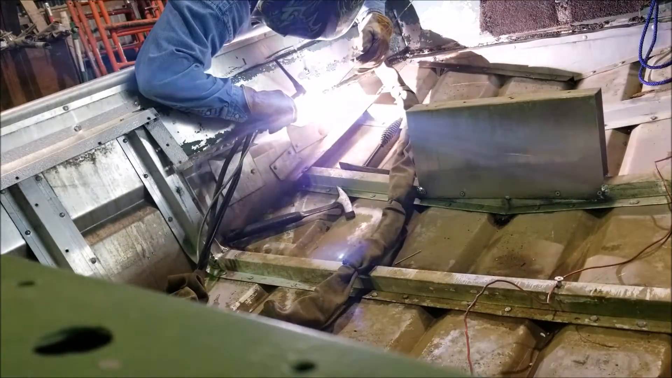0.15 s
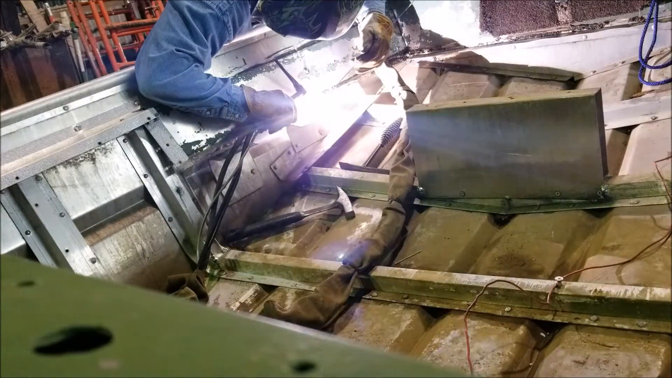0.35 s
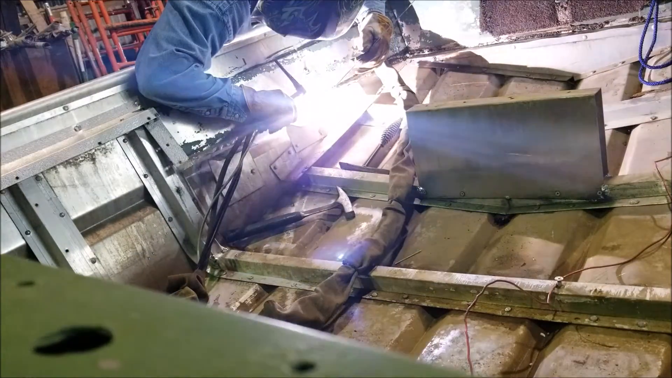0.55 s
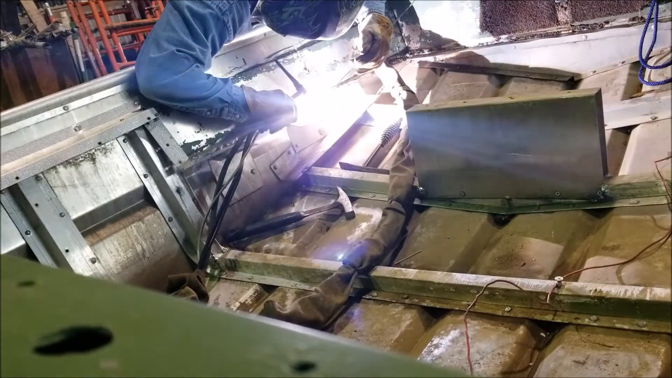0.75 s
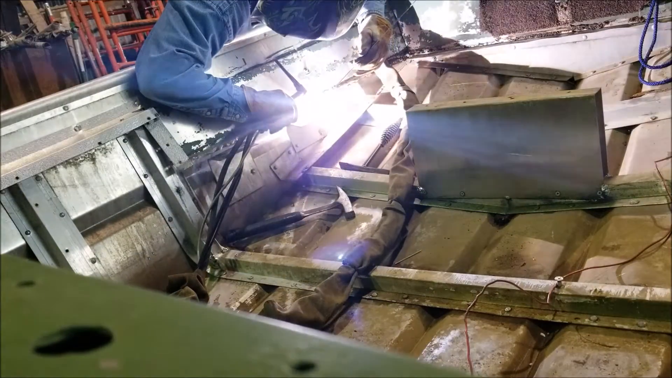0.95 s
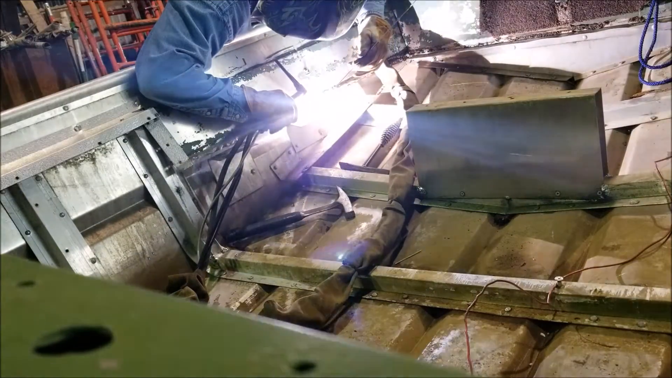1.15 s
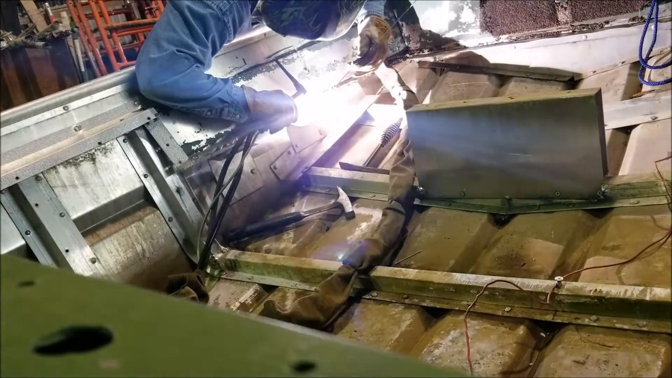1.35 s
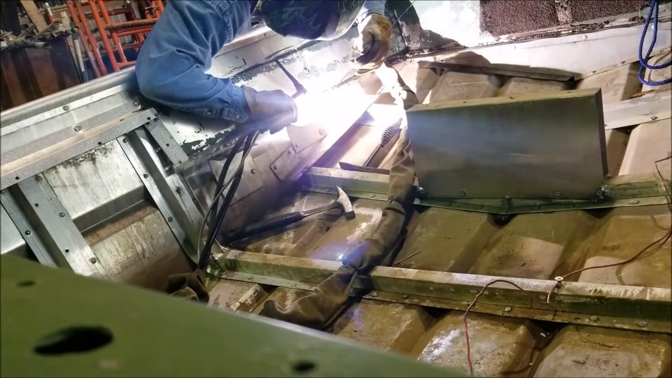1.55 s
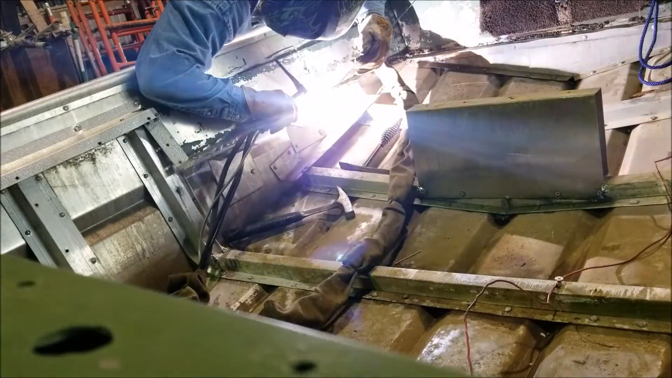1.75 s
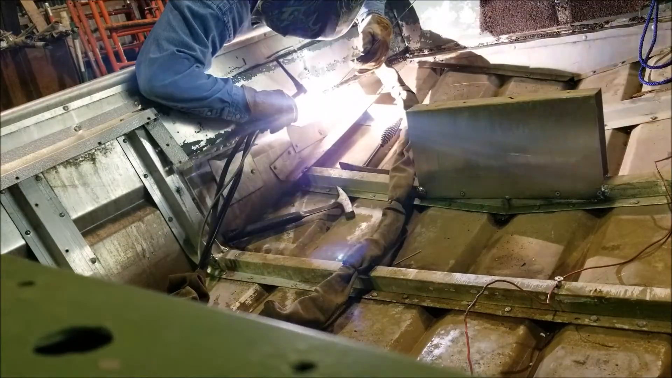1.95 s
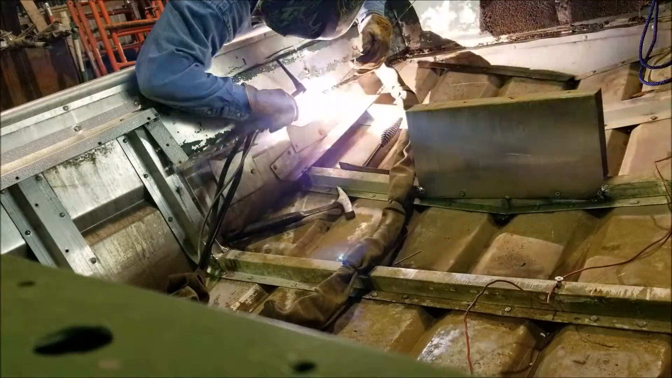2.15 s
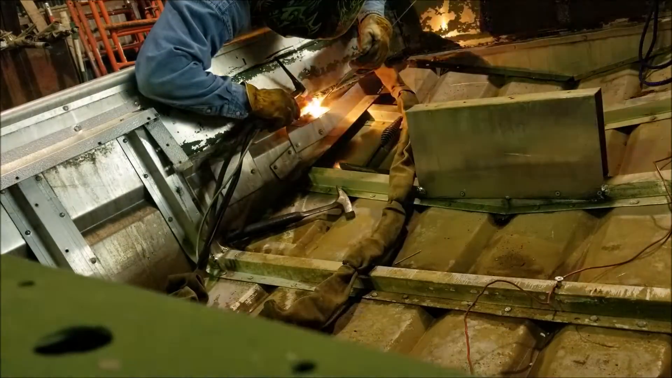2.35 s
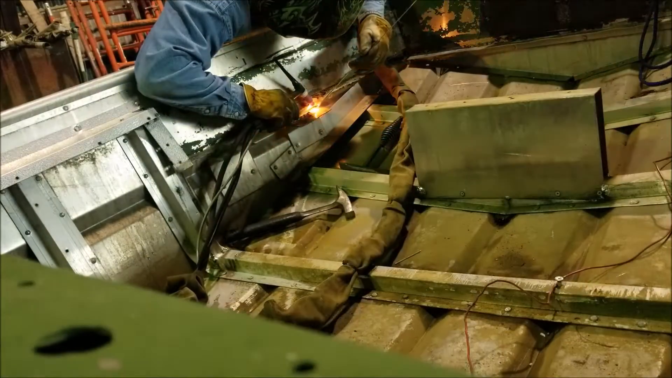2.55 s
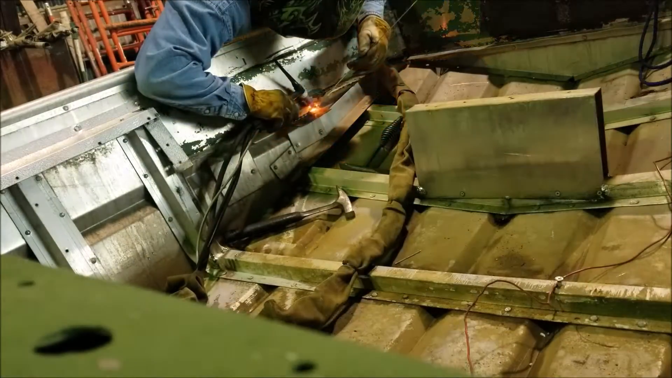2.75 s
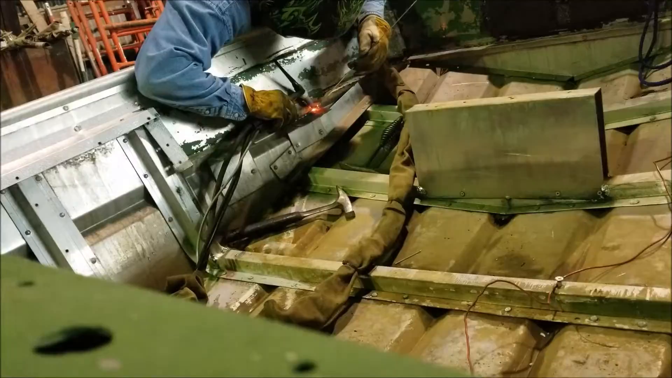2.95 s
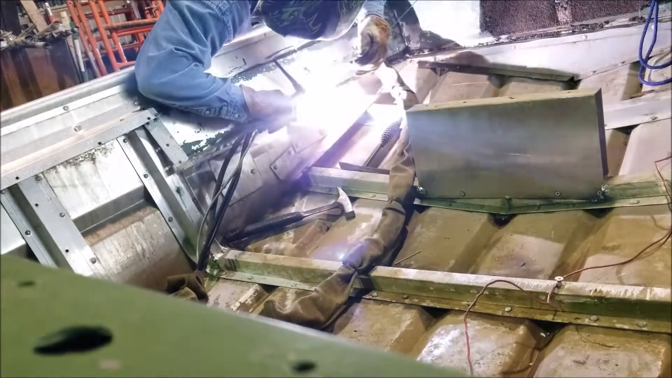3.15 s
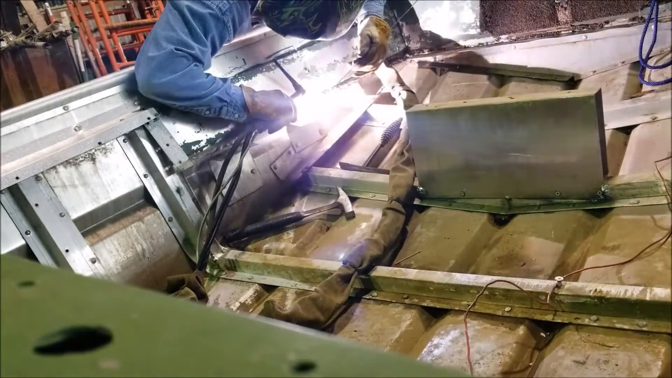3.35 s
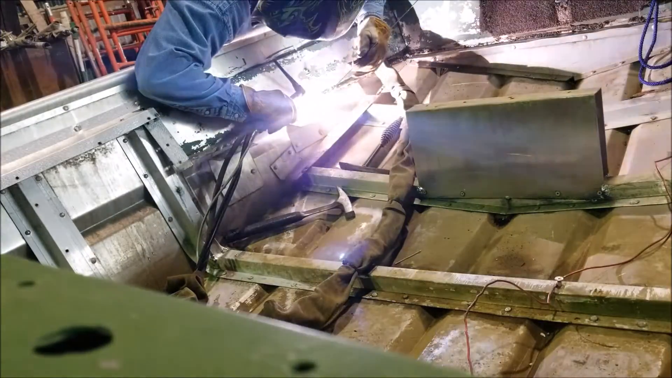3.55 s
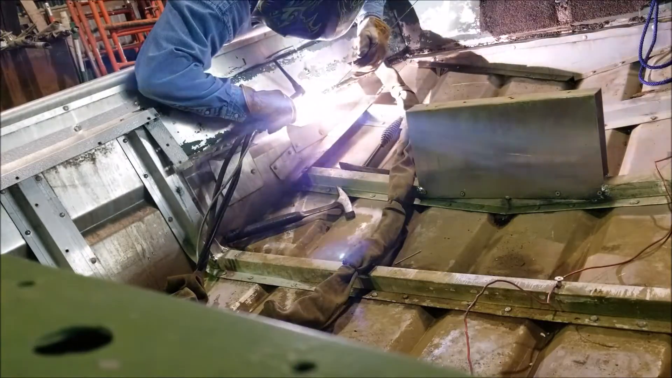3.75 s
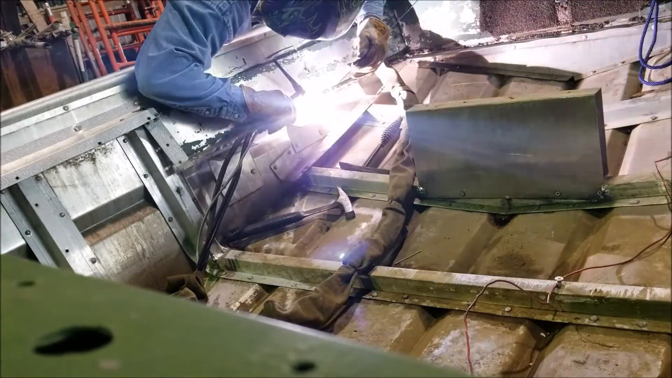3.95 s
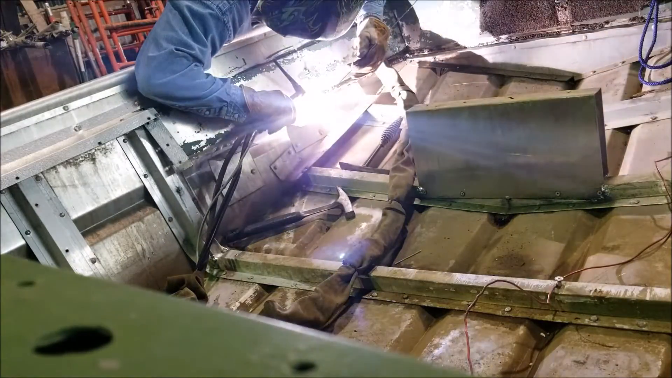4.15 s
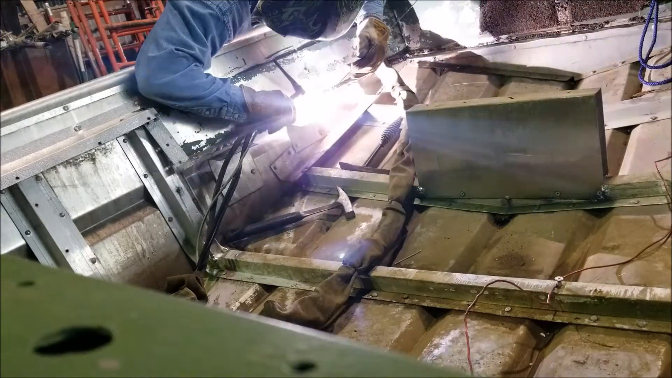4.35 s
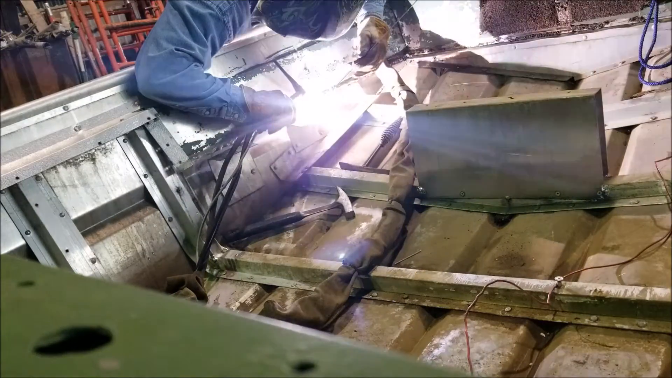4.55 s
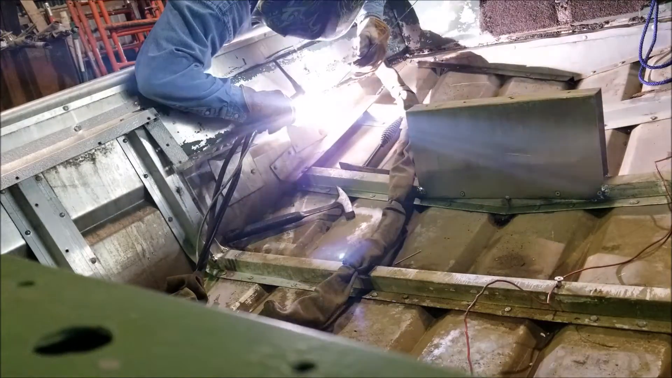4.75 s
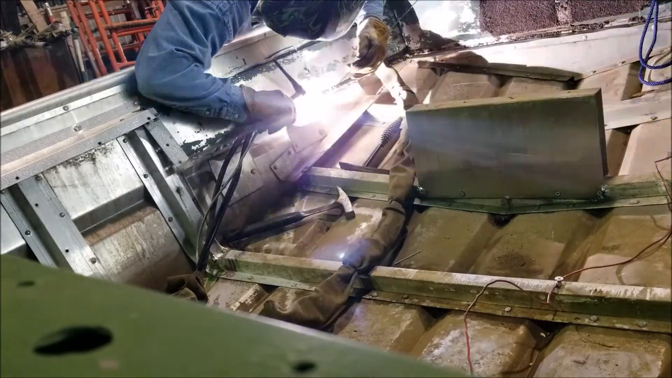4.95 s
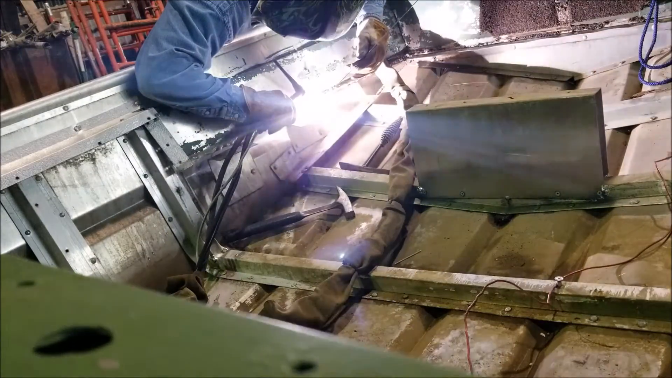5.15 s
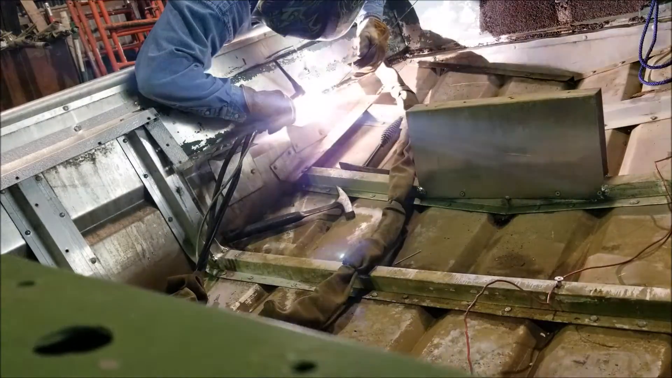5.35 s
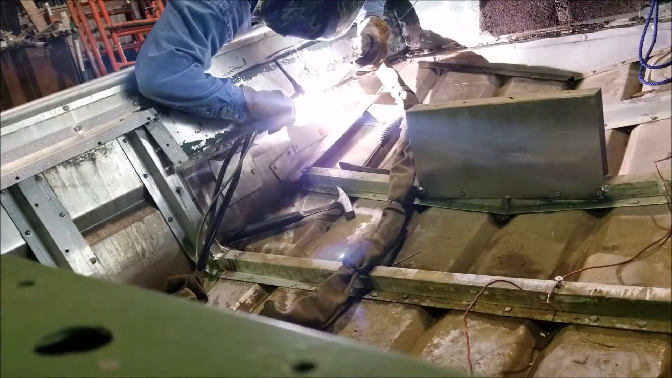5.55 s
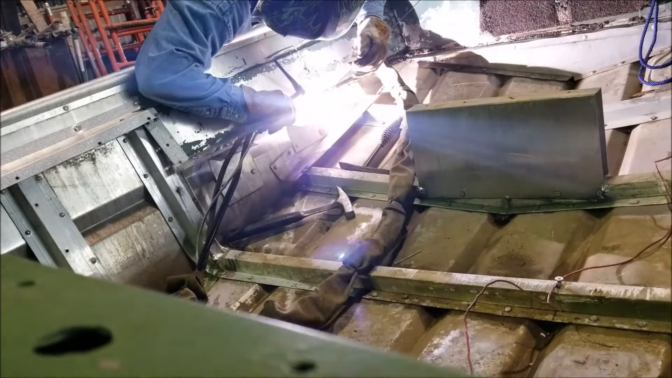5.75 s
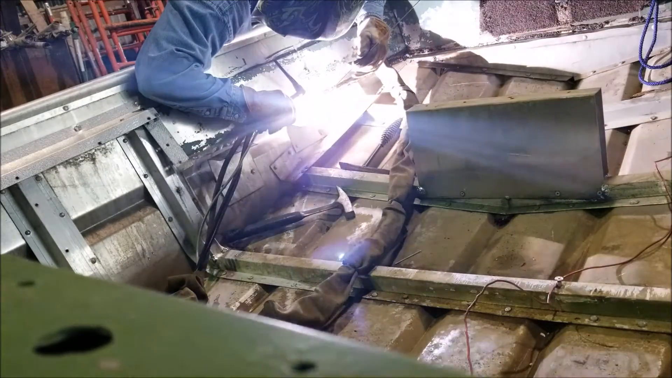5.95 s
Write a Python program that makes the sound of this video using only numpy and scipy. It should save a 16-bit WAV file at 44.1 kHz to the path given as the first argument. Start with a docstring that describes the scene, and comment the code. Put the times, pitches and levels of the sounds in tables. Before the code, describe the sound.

From the start, an electric welding arc burns on an aluminium hull: a rapid, buzzing crackle with a bright, fluttering sizzle and irregular sharp snaps of spatter. Underneath run a cooling fan's low drone and rush of air, a transformer hum and a faint building rumble. The crackle swells slightly and cuts off at about 2.3 seconds. The hum drops, a faint gas hiss trails away and the fan continues. At 2.9 seconds comes a short, bright puff of gas with a slight whistle. At 3.1 seconds the arc strikes again with a loud crack, a tiny chirp and a soft low thump, followed by a flurry of snaps. The strike overloads the microphone, and everything dips for about a second before recovering. The crackling continues to the end, around 6 seconds, with a light garage echo.

```python
"""A garage: an arc welder works on an aluminium hull. The arc re-ignites at every half wave of the mains, a
little earlier and weaker on one polarity than the other; it goes out, shielding gas puffs, it strikes again.
Behind it the building rumbles, a cooling fan drones and the transformer hums under load. The strike overloads
the recorder, which turns down its gain."""
import sys
import numpy as np
from scipy import signal
from scipy.fft import rfft, irfft
from scipy.io import wavfile
from scipy.ndimage import uniform_filter1d

SR = 44100
rng = np.random.default_rng(int(sys.argv[2]) if len(sys.argv) > 2 else 0)


def persist_wave(psi):
    """Save psi, clipped to +-1, as 16-bit WAV."""
    counts = np.round(np.clip(psi, -1, 1) * 32767).astype(np.int16)
    wavfile.write(sys.argv[1], SR, np.atleast_2d(counts).T)


N = 264600
TIME_S, BIN_HZ = np.arange(N) / SR, np.fft.rfftfreq(N, 1 / SR)
HALF_WAVE_HZ, MAINS_ZERO_S = 120.02, -.0002


def gain_of(db):
    """Decibels to a factor."""
    return 10 ** (np.asarray(db) / 20)


def unit_rms(x):
    """Scales to rms 1."""
    return x / np.sqrt(np.mean(x ** 2) + 1e-20)


def curve_at(points, hz):
    """Interpolates on a log-frequency axis."""
    f, value = np.transpose(points)
    return np.interp(np.log(hz + 1), np.log(f + 1), value)


def wander(rate_hz):
    """Smoothed noise, rms 1."""
    width = int(SR / rate_hz)
    return unit_rms(uniform_filter1d(uniform_filter1d(rng.standard_normal(N), width), width))


def coloured(x, spectrum):
    """Minimum-phase filter; output rms 1."""
    log_gain = np.log(gain_of(curve_at(spectrum, abs(np.fft.fftfreq(4096, 1 / SR)))))
    taps = np.fft.ifft(np.exp(log_gain - 1j * signal.hilbert(log_gain).imag)).real[None, :2048]
    return unit_rms(signal.oaconvolve(x, taps, axes=1)[:, :N])


def echoes(x, t60_s, length_s, gap_samples):
    """Sparse decaying reflections of random sign, tap energy 1 per side."""
    slots = np.arange(gap_samples, int(length_s * SR), gap_samples)
    at = slots + rng.integers(0, gap_samples, (2, len(slots)))
    taps = np.zeros((2, at.max() + 1))
    np.put_along_axis(taps, at, rng.choice([-1., 1.], at.shape) * gain_of(-60 * at / SR / t60_s), 1)
    taps /= np.linalg.norm(taps, axis=1, keepdims=True)
    return signal.oaconvolve(x, taps, axes=1)[:, :N]


def left_leading(x, samples):
    """Mono to stereo; the sound reaches the left port first."""
    return np.array([irfft(rfft(x) * np.exp(2j * np.pi * BIN_HZ / SR * samples), N), x])


def impulses(times_s, levels_db):
    """One-sample clicks."""
    train = np.zeros(N)
    train[(times_s * SR).astype(int)] = gain_of(levels_db)
    return train


def garage(x):
    """Adds the room's long tail, its treble soaked up."""
    dull = signal.sosfilt(signal.butter(2, 5700, fs=SR, output="sos"), x)
    return x + gain_of(-14) * echoes(dull, t60_s=1, length_s=.7, gap_samples=22)


# Hull peaks and dips. Each row: centre in Hz, half width in Hz, gain in dB.
PLATE_BANDS = [(1330, 60, -6), (1450, 60, 2), (1680, 60, 3), (1790, 35, -4), (2080, 90, 3), (2240, 50, -7),
               (2450, 80, 3), (2650, 70, 3), (4250, 90, -5), (4430, 100, 4), (5100, 70, 2.5), (5870, 90, 4)]

def hull(x):
    """Ribs and plates near the torch return early echoes and stress some bands."""
    plate_db = sum(db / (1 + ((BIN_HZ - hz) / width_hz) ** 2) for hz, width_hz, db in PLATE_BANDS)
    early = gain_of(-14) * echoes(x, t60_s=.03, length_s=.012, gap_samples=25)
    return irfft(rfft(x + early) * gain_of(plate_db), N)


def rumble():
    """Lumpy low noise of the building."""
    low = signal.sosfilt(signal.butter(3, 75, fs=SR, output="sos"), rng.standard_normal(N))
    return gain_of(-60) * unit_rms(low * gain_of(6 * wander(9)))


# Each row: time in seconds, level offset in dB.
NOISE_DRIFT = [(0, -0.5), (1.5, 1), (2.3, 0.5), (2.8, -3), (3.05, 0.5), (3.2, 0), (4.3, 0), (5, 0),
               (5.7, 1.5)]

def drift_db():
    """Slow level drift of fan air and sizzle."""
    return np.interp(TIME_S, *np.transpose(NOISE_DRIFT))


# Each row: frequency in Hz, relative noise density in dB.
AIR_SPECTRUM = [(20, -32), (35, -18), (55, -12), (90, -1), (140, -3.5), (200, -4.5), (340, -4.5),
                (500, -6.5), (620, -12), (800, -11), (1000, -17), (2000, -22), (6000, -48), (16000, -53)]
# Each row: frequency in Hz, left-right correlation.
AIR_CORRELATION = [(30, 0.81), (60, 0.89), (180, 0.75), (550, 0.28), (1650, 0.081), (15000, 0.28)]

def fan_air(burning):
    """Rush of cooling air, slightly louder while the arc burns."""
    left, independent = rfft(rng.standard_normal((2, N)))
    alike = curve_at(AIR_CORRELATION, BIN_HZ)
    right = alike * left + np.sqrt(1 - alike ** 2) * independent
    air = irfft(np.array([left, right]) * gain_of(curve_at(AIR_SPECTRUM, BIN_HZ)), N)
    return gain_of(-38 + 1.45 * burning + wander(3.3) + drift_db()) * unit_rms(air)


# Each row: harmonic number, relative level in dB, phase in radians.
FAN_PARTIALS = [(1, 0, -2.3), (3, -20, 0)]

def fan_drone(pitch_hz=111.89):
    """Tone of the cooling fan; its speed wavers."""
    phase = 2 * np.pi * pitch_hz * TIME_S + .22 * wander(1.5)
    tone = sum(gain_of(db) * np.cos(k * phase + rad) for k, db, rad in FAN_PARTIALS)
    return tone * gain_of(.91 * wander(13))


# Each row: multiple of the mains frequency, relative level in dB, phase in radians.
HUM_PARTIALS = [(1, -27, -2), (2, -8.5, .5), (3, -15.5, 2.1), (4, -18, -.3), (5, -19.5, 1.1),
                (7, -21.5, 2.2), (8, -23.5, 1.8)]

def transformer(burning):
    """Mains hum, louder while current flows."""
    phase = np.pi * HALF_WAVE_HZ * (TIME_S - MAINS_ZERO_S)
    hum = sum(gain_of(db + 2.1 * wander(15)) * np.cos(k * phase + rad) for k, db, rad in HUM_PARTIALS)
    return (.18 + .6 * burning) * hum


# Each row: centre in seconds, peak level in dB.
LOW_THUMPS = [(.955, -36), (3.104, -34)]

def thumps(half_width_s=.011):
    """Soft low pushes without ring."""
    return sum(gain_of(db) * np.exp(-((TIME_S - s) / half_width_s) ** 2) for s, db in LOW_THUMPS)


# Each row: frequency in Hz, relative noise density in dB.
JET_SPECTRUM = [(500, -7), (1000, -2.5), (2000, 2.5), (4000, -3), (8000, -7.5), (12000, -7), (16500, -31)]

def shielding_gas(valve_s=2.905):
    """Between burns gas bleeds away; the valve opens with a bright puff and the nozzle whistles."""
    break_s, restrike_s = ARC_RUNS[0][1], ARC_RUNS[1][0]
    arc_out = (TIME_S > break_s) & (TIME_S < restrike_s)
    afterflow = gain_of(-37 - 10 * np.log10(1 + abs(TIME_S - break_s) / .0088))
    open_s = np.maximum(TIME_S - valve_s, 0)
    opening = np.minimum(open_s / .023, 1)
    puff = opening * (gain_of(-32) * np.exp(-open_s / .04) + gain_of(-53.5))  # settles to a flow
    jet = coloured(rng.standard_normal((2, N)), JET_SPECTRUM)
    nozzle = signal.iirpeak(2140, Q=28, fs=SR)
    whistle = unit_rms(signal.lfilter(*nozzle, rng.standard_normal((2, N))))
    whistle *= np.minimum(open_s / .03, 1) ** 2 * gain_of(-43.5 - 14 * open_s)
    highpass = signal.butter(2, 9000, "high", fs=SR, output="sos")
    edge = unit_rms(signal.sosfilt(highpass, rng.standard_normal((2, N))))
    edge *= opening * gain_of(-32) * np.exp(-open_s / .023)
    return arc_out * ((afterflow + puff) * jet + edge + whistle)


def rising_chirp(start_s=3.0985, start_hz=2600, rise_hz_per_s=90000, t60_s=.025):
    """Short rising chirp near 3 kHz."""
    age_s = np.clip(TIME_S - start_s, 0, .1)
    cycles = (start_hz + .5 * rise_hz_per_s * age_s) * age_s
    return gain_of(-15 - 60 * age_s / t60_s) * np.sin(2 * np.pi * cycles)


# Each row: frequency in Hz, relative noise density in dB.
SIZZLE_SPECTRUM = [(500, -10.5), (900, 2.5), (1400, 0.5), (2100, 3), (3000, -0.5), (5000, -11.5),
                   (8000, -6.5), (16500, -5.5)]

def sizzle(burning):
    """Fluttering hiss of shielding gas while the arc burns; fills the gaps between cracks."""
    flutter_db = 2.33 * wander(61) + 1.73 * wander(44)
    shared, *sides = rng.standard_normal((3, N))
    noise = coloured(.8 * left_leading(shared, samples=8.74) + np.array(sides), SIZZLE_SPECTRUM)
    return noise * gain_of(-39 + flutter_db + drift_db()) * burning


# Each row: strike in seconds, break in seconds.
ARC_RUNS = [(-2, 2.256), (3.095, 9)]
# The arc weakens. Each row: start in seconds, end in seconds, level offset in dB.
ARC_FALTERS = [(4.145, 4.286, -1.5)]

def arc_level_db():
    """The arc runs hotter just after a strike and swells as the torch lifts towards the break."""
    level_db = np.full(N, -120.)
    for strike_s, break_s in ARC_RUNS:
        surge_db = 10.5 * np.exp(-abs(TIME_S - strike_s) / .17)
        swell_db = 4 * np.exp(-abs(break_s - TIME_S) / .42)
        lit = (TIME_S > strike_s) & (TIME_S < break_s)
        level_db = np.where(lit, -25.5 + surge_db + swell_db, level_db)
    for start_s, end_s, db in ARC_FALTERS:
        level_db += db * ((TIME_S > start_s) & (TIME_S < end_s))
    return level_db


def half_wave_index(times_s):
    """Index of the nearest half wave."""
    return np.round((np.array(times_s) - MAINS_ZERO_S) * HALF_WAVE_HZ).astype(int) - 1


# Half waves that fail to catch. Each entry: time in seconds.
MISFIRES_S = [.017, .025, .033, .083, .417, .483, .5, .567, .75, .817, .833, .933, 1.0, 1.033, 1.066, 1.133,
              1.216, 1.275, 1.316, 1.333, 1.358, 1.4, 1.466, 1.475, 1.5, 1.516, 1.666, 1.683, 1.75, 1.95,
              2.05, 4.149, 4.366, 4.383, 4.399, 4.466, 4.516, 4.524, 4.674, 4.799, 4.816, 4.974, 5.116,
              5.166, 5.199, 5.216, 5.316, 5.349, 5.382, 5.616, 5.849, 5.916, 5.949, 5.974]
# Prominent cracks. Each row: start in seconds, relative level in dB.
ACCENT_CRACKS = [(0.1, -24), (0.1676, -22.5), (0.173, -25), (0.283, -24), (0.4005, -20.5), (.408, -24),
                 (.4327, -24), (0.4917, -27), (0.541, -22), (0.5492, -24), (.558, -26), (0.5727, -24),
                 (.625, -21), (0.642, -19), (0.666, -19.5), (0.708, -22), (0.783, -20), (.799, -19.5),
                 (0.858, -20.5), (0.8928, -23), (0.8984, -20.5), (0.966, -19), (0.9833, -20),
                 (1.0413, -23.5), (1.0746, -22), (1.082, -18), (1.1255, -16.5), (1.176, -20), (1.209, -22),
                 (1.2326, -16.5), (1.242, -17), (1.249, -20), (1.282, -20.5), (1.3429, -17), (1.3493, -21),
                 (1.367, -18), (1.433, -21), (1.481, -26), (1.533, -16), (1.592, -32), (1.6416, -21),
                 (1.65, -18), (1.658, -21), (1.8252, -19.5), (1.833, -17), (1.8404, -21), (1.875, -22),
                 (1.8978, -22), (1.915, -23), (1.966, -20.5), (2.016, -25), (2.0917, -19), (2.108, -24),
                 (2.126, -29), (2.1492, -19.5), (2.174, -18), (2.183, -18), (2.1907, -20), (2.2076, -21),
                 (2.216, -23), (2.2252, -15.5), (2.2326, -16), (2.241, -19), (2.2493, -16), (3.0984, -2),
                 (3.1066, -27), (3.1163, -6.5), (3.121, -14), (3.1328, -12), (3.139, -20), (3.149, -21),
                 (3.156, -18), (3.1727, -18), (3.1825, -22), (3.206, -25), (3.225, -29), (3.242, -28),
                 (3.2556, -22), (3.272, -24), (3.44, -24), (3.474, -23), (3.483, -21), (3.5326, -23),
                 (3.5738, -31), (3.6159, -24), (3.6573, -27), (3.699, -20), (3.7075, -24), (3.7406, -21),
                 (3.767, -32), (3.841, -31), (3.89, -24), (3.924, -24), (3.9496, -19.5), (3.957, -24),
                 (4.058, -24.5), (4.082, -24), (4.099, -18.5), (4.1248, -24), (4.1316, -21), (4.3, -22),
                 (4.307, -22), (4.324, -18), (4.333, -20.5), (4.3574, -24), (4.3752, -19), (4.431, -15.5),
                 (4.482, -19), (4.499, -20), (4.549, -20), (4.599, -20), (4.6155, -23), (4.657, -16),
                 (4.715, -20), (4.782, -22), (4.8077, -20), (4.847, -24), (4.914, -17), (4.9239, -23),
                 (4.98, -19), (5.049, -22), (5.124, -22), (5.1317, -19), (5.149, -22), (5.173, -23),
                 (5.1907, -23), (5.2254, -22.5), (5.232, -25), (5.241, -28), (5.2997, -23), (5.3738, -21),
                 (5.4156, -25), (5.431, -23), (5.447, -20.5), (5.465, -22), (5.49, -30), (5.515, -20.5),
                 (5.632, -24), (5.698, -22), (5.716, -24), (5.782, -24), (5.898, -22)]

def ignitions(level_db):
    """One impulse per half wave; one polarity fires earlier and weaker."""
    count = np.arange(1, int(HALF_WAVE_HZ * N / SR))
    times_s = MAINS_ZERO_S + count / HALF_WAVE_HZ
    weak_polarity = count % 2 == 0
    jitter, spread = rng.standard_normal((len(count), 2)).T
    force_db = np.where(weak_polarity, -5 + 2 * spread, -.1 + 2.6 * spread)
    force_db[half_wave_index(MISFIRES_S)] = -30
    blow_db = level_db[(times_s * SR).astype(int)] + np.minimum(force_db, 2.5)
    times_s = times_s - .0012 * weak_polarity + .00045 * np.clip(jitter, -2, 2)
    accent_s, accent_db = np.transpose(ACCENT_CRACKS)
    accented = np.clip(half_wave_index(accent_s), 0, len(count) - 1)
    times_s[accented], blow_db[accented] = accent_s, accent_db
    return impulses(times_s, blow_db)


def brighten_strong(cracks, blows):
    """Extra force goes mostly into the treble: strong cracks lose body, weak ones gain it."""
    body = signal.oaconvolve(cracks, signal.firwin(101, 8500, fs=SR)[None], "same")
    latest = blows[np.maximum.accumulate(np.arange(N) * (blows > 0))]
    usual = abs(uniform_filter1d(blows, size=2600)) * SR / HALF_WAVE_HZ
    fullness = np.clip((usual + 1e-9) / (latest + 1e-9), .1, 3) ** .35
    return cracks + (fullness - 1) * body


# Sharp spatter snaps. Each row: start in seconds, relative level in dB.
SPATTER = [(.1672, -14), (.4922, -6), (.5505, -13), (.5747, -2), (1.4813, -7), (1.5926, -13), (1.8989, -14),
           (2.1252, -10), (2.234, -11), (2.2512, -5), (3.1005, -8), (3.119, 0), (3.241, -3), (3.2742, -5),
           (3.441, -12), (3.5743, -11), (3.616, -11), (3.6575, -11), (3.7078, -10), (3.7662, -8),
           (3.8412, -12), (3.9244, -11), (4.5993, -12), (4.7907, -13), (4.9155, -10), (4.9243, -10),
           (5.0486, -11), (5.133, -9), (5.1499, -8), (5.2254, -10), (5.2321, -11)]
# Each row: frequency in Hz, relative noise density in dB.
CRACK_SPECTRUM = [(900, -14), (2000, -8), (4000, -9.5), (7000, -3.5), (12000, 1.5), (16500, -1)]

def arc_cracks(blows):
    """Each ignition snaps, sputters and dies away; spatter adds clicks; the garage answers."""
    age_s = np.arange(900) / SR
    snap = 1.44 * np.exp(-age_s / .00035)
    sputter = .33 * (1 - np.exp(-age_s / .00029)) / (1 + (age_s / .0037) ** 4)
    tail = .72 * (1 - np.exp(-age_s / .00089)) * np.exp(-age_s / .0029)
    train_rms = np.sqrt(np.sum((snap + sputter) ** 2 + tail ** 2) * HALF_WAVE_HZ / SR)
    spits = impulses(*np.transpose(SPATTER))
    attacks = signal.oaconvolve(blows, (snap + sputter) / train_rms)[:N]
    attacks += signal.oaconvolve(spits, np.exp(-age_s / .00025))[:N]
    tails = signal.oaconvolve(blows, tail / train_rms)[:N]
    shared, *sides = unit_rms(gain_of(3.5 * wander(1700)) * rng.standard_normal((3, N)))  # gritty noise
    cracks = attacks * (.66 * left_leading(shared, samples=1.33) + .5 * np.array(sides)) + 2.5 * spits
    shared, *sides = rng.standard_normal((3, N))
    cracks += tails * (.83 * left_leading(shared, samples=1.33) + 1.21 * np.array(sides))
    cracks += gain_of(-19) * echoes(cracks, t60_s=.18, length_s=.3, gap_samples=22)
    level = gain_of(-7) * np.sqrt(np.mean(cracks ** 2))
    return brighten_strong(level * coloured(cracks, CRACK_SPECTRUM), blows)


def scene():
    """Arc and gas sound inside the hull; the machine stands in the garage."""
    level_db = arc_level_db()
    burning = uniform_filter1d((level_db > -100) * 1., 200)
    torch = arc_cracks(ignitions(level_db)) + sizzle(burning) + shielding_gas()
    welding = garage(hull(torch))
    pan = gain_of([[-.4], [.4]])
    drone = gain_of(-28.5) * pan * (fan_drone() + transformer(burning))
    return welding + drone + fan_air(burning) + thumps() + rising_chirp() + rumble()


def gain_control(x, trip_db=-8, hold_s=1.124, recover_s=.17, limit_db=-5.5, release_db_per_s=198):
    """Gain creeps against the level; an overload ducks it for a while; peaks are limited."""
    power = (x ** 2).mean(0)

    def level_db(samples):
        return 10 * np.log10(abs(uniform_filter1d(power, samples)) + 1e-12)

    pole = np.exp(-1 / (.55 * SR))
    creep_db = -.29 * signal.lfilter([1 - pole], [1, -pole], level_db(2000) + 26)
    overload = level_db(330) + creep_db > trip_db
    since_s = TIME_S - np.maximum.accumulate(np.where(overload, TIME_S, -99))
    duck_db = 7 * np.exp(-np.maximum(since_s - hold_s, 0) / recover_s)
    release_db = release_db_per_s * TIME_S
    peak_db = np.maximum.accumulate(level_db(200) + creep_db + release_db) - release_db
    excess_db = np.maximum(peak_db - limit_db, 0)
    return x * gain_of(.9 + creep_db - uniform_filter1d(duck_db + excess_db, size=100))


# Microphone ports. Each row: frequency in Hz, left gain in dB, right gain in dB.
PORT_RESPONSE = [(300, -.4, .4), (600, 1, -.5), (1000, 1, -.5), (1600, .5, -.5), (2300, .5, -3),
                 (3200, -.5, 2.5), (3700, 5, 2.5), (4300, 2.5, 3), (5500, 2.5, 1.5), (6600, 3, 4.5),
                 (6950, 8.5, 5), (7600, 5, 2.5), (8200, -2, -3), (8600, -4, 3.5), (9100, -3.5, 8),
                 (9600, -1.5, 5.5), (10000, -5, 5), (10700, 1, 7.5), (11300, .5, 0), (12150, 5.5, 15),
                 (12450, 5.5, 12.5), (12750, 9, 17), (13050, 10, 12.5), (13350, 7, 15), (13900, 9, 12),
                 (14400, 10, 9), (14800, 11.5, 11.5), (15200, 10.5, 8), (15550, 15, 9), (15800, 12, 8)]

def record(dry):
    """The ports colour the treble; then gain control, soft clipping and band limit."""
    hz, *sides_db = np.transpose(PORT_RESPONSE)
    port_db = np.array([curve_at(np.transpose([hz, db]), BIN_HZ) for db in sides_db])
    picked_up = irfft(rfft(dry) * gain_of(port_db), N)
    rounded = .9 * np.tanh(gain_control(picked_up) / .9)
    lowpass = signal.firwin(1501, 15840, window=("kaiser", 9), fs=SR)
    return signal.oaconvolve(rounded, lowpass[None], "same")


dry = scene()
out = record(dry)
persist_wave(out)
```